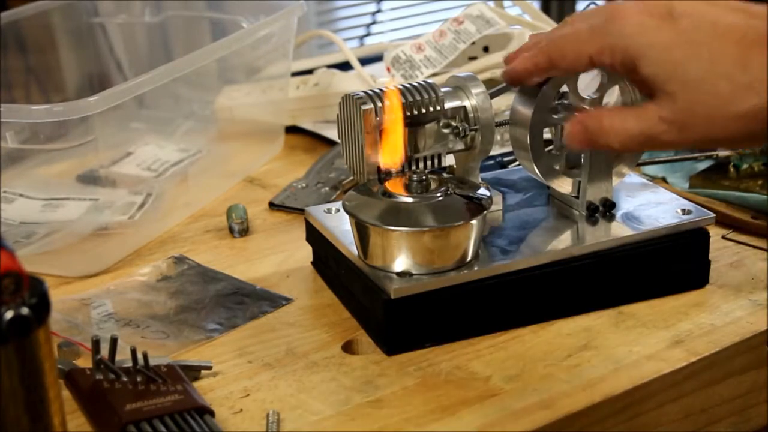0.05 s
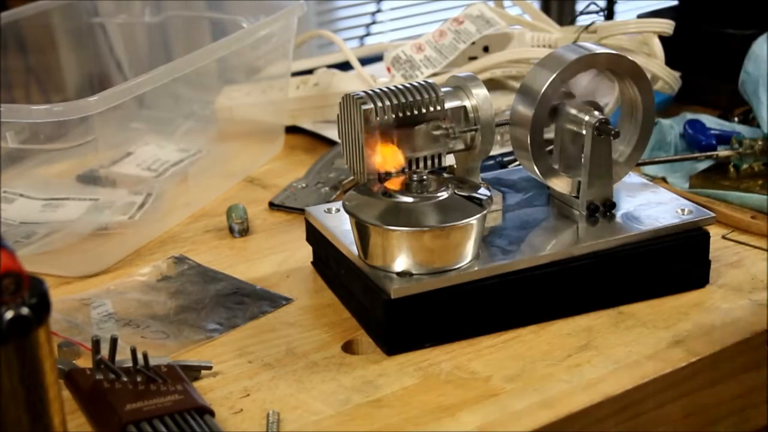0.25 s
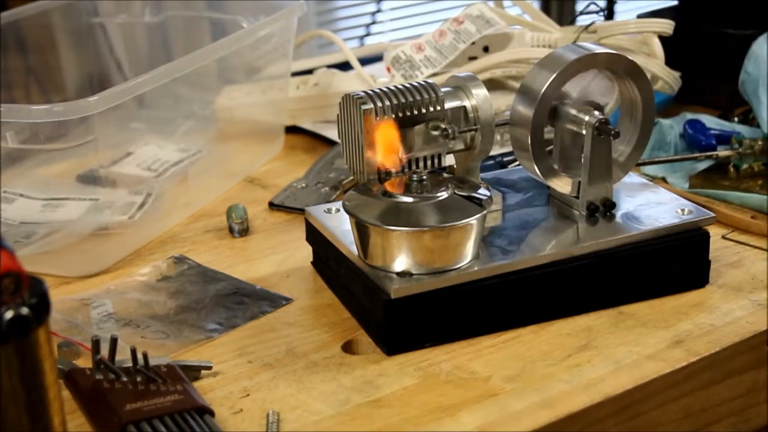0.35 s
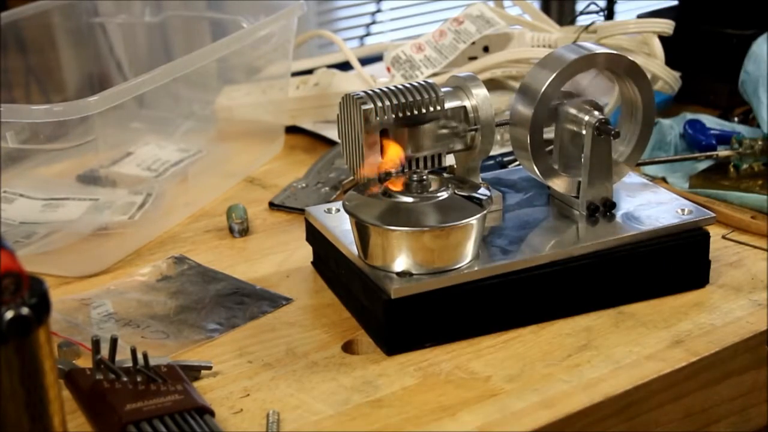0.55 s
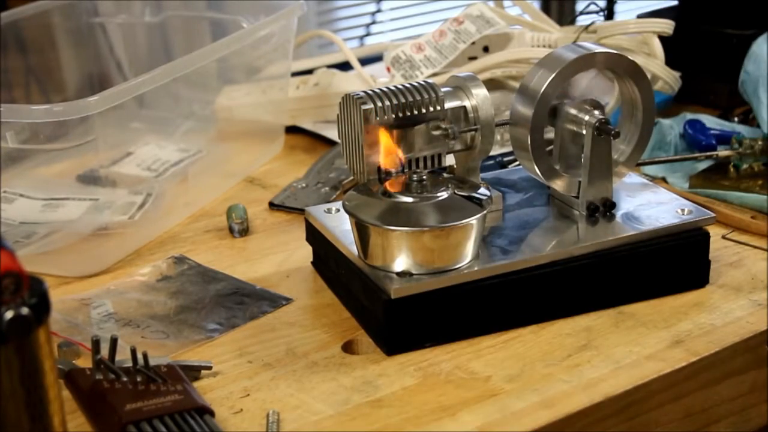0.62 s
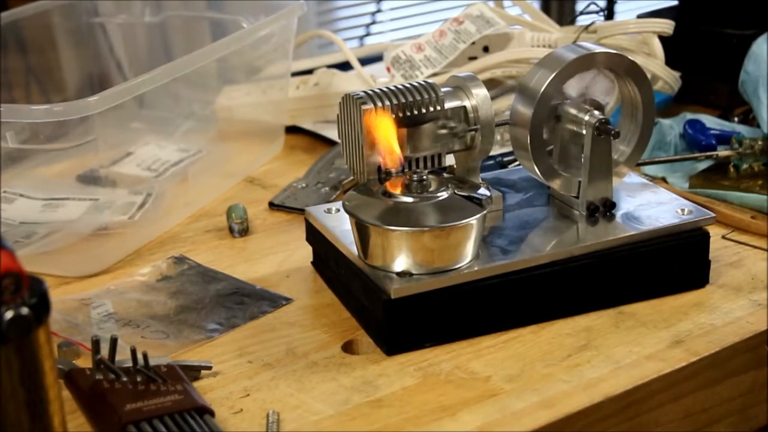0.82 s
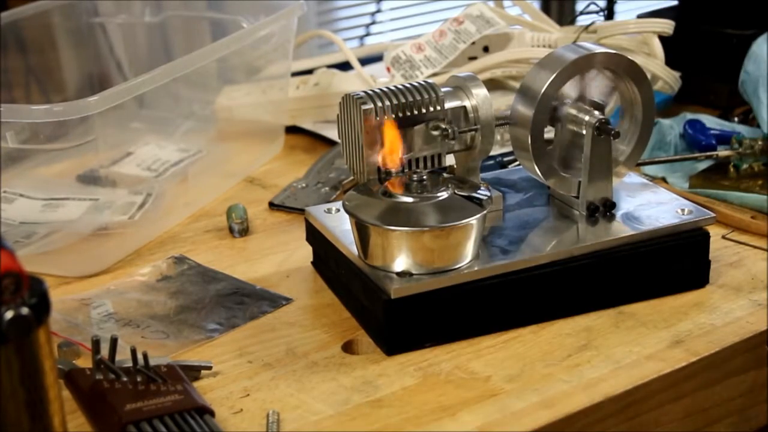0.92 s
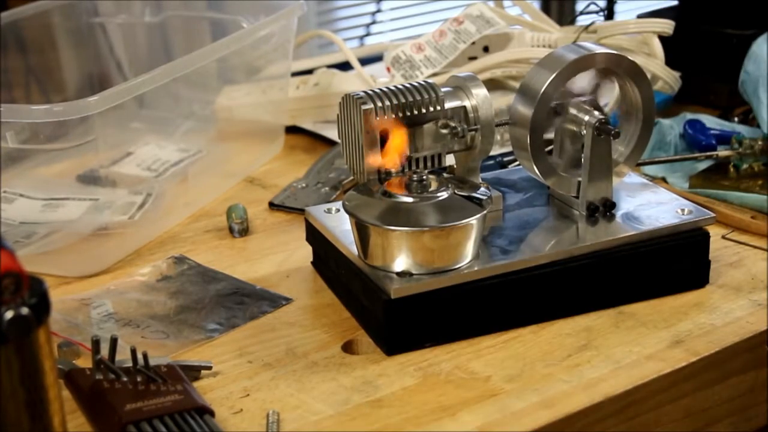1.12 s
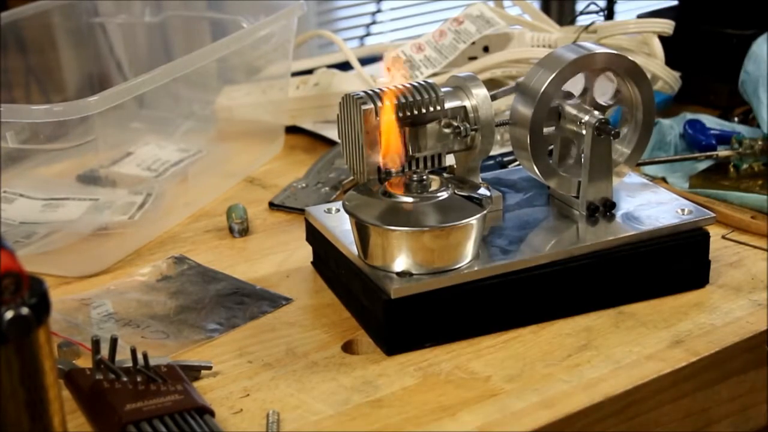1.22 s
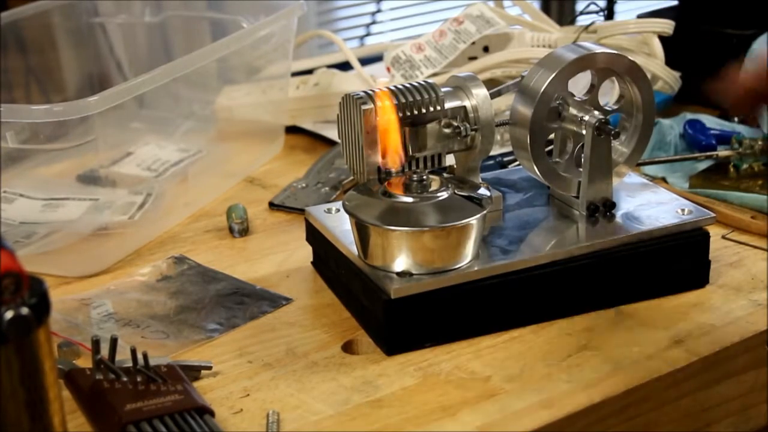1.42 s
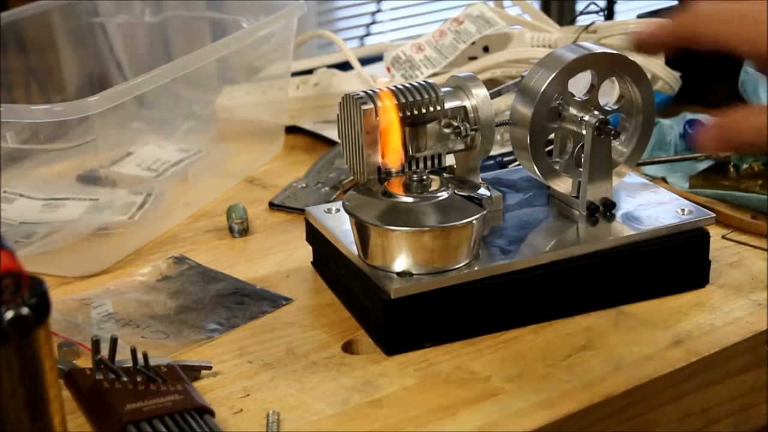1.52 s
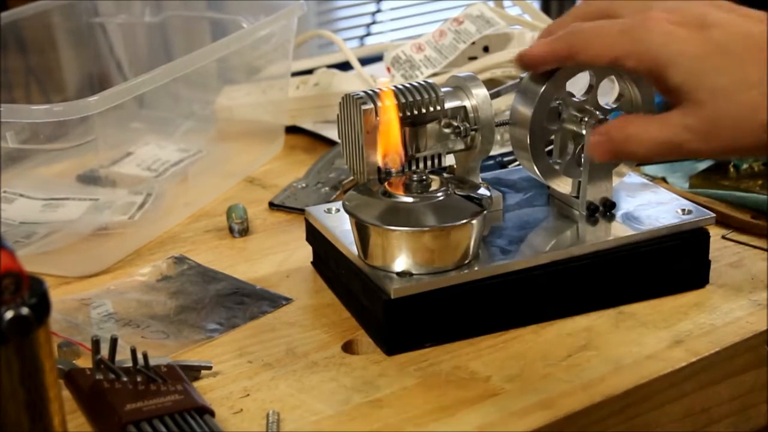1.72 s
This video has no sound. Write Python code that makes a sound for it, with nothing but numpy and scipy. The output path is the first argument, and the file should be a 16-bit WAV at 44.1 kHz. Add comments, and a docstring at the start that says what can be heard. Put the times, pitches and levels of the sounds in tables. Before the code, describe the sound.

A small metal model engine, flicked by its flywheel, rattles and clacks through a few turns with thin, high squeaks. Its base knocks on a wooden workbench, and it stalls in a softly humming workshop with a short echo.

```python
"""First comes the steady hum of a small workshop. Then a small metal model engine, flicked by its
flywheel, rattles through a few turns and stalls. Its loose linkage clacks and rings the frame. Its dry
piston squeals on every stroke, the pitch rising and falling with the sliding speed; it also scrapes and
groans under load and judders as it breaks loose. The base knocks on the wooden workbench, and the room
adds a short echo."""
import sys
import numpy as np
from scipy import signal
from scipy.fft import rfft, irfft
from scipy.io import wavfile

SR = 44100
rng = np.random.default_rng(int(sys.argv[2]) if len(sys.argv) > 2 else 0)


def wrap_up_sound(samples):
    """Save the sound to the file named by the first command line argument, as 16-bit audio."""
    columns = np.atleast_2d(samples).T
    # keep every value between -1 and 1, then stretch to whole-number steps
    tamed = np.clip(columns, -1, 1)
    steps = np.round(tamed * 32767).astype(np.int16)
    wavfile.write(sys.argv[1], SR, steps)


N = 77175
TIME = np.arange(N) / SR


def from_db(db):
    """Turn decibels into a number to multiply by."""
    return 10 ** (np.asarray(db) / 20)


def unit_power(x):
    """Scale a signal so that its average power is 1."""
    return x / np.sqrt(np.mean(x ** 2) + 1e-20)


def at_each_hz(table):
    """Fill in a table's value at every frequency."""
    hz, value = np.transpose(table)
    return np.interp(np.log(np.fft.rfftfreq(N, 1 / SR) + 1e-9), np.log(hz), value)


def colour(x, spectrum):
    """Turn each frequency up or down by a table's decibels."""
    return irfft(rfft(x) * from_db(at_each_hz(spectrum)), N)


def noise(spectrum):
    """Noise of power 1, coloured by a table."""
    return unit_power(colour(rng.standard_normal(N), spectrum))


def drift(hz):
    """A smooth random wobble of about 1 either way; more hz makes it faster."""
    r = np.exp(-2 * np.pi * hz / SR)
    white = rng.standard_normal(N + SR // 2)
    return unit_power(signal.lfilter([1], [1, -2 * r, r * r], white)[-N:])


def dying(start, fade_s):
    """Jump to 1, then die away. A fade time is how long a sound takes to drop 60 dB."""
    age = TIME - start
    return (age >= 0) * from_db(-60 * np.clip(age / fade_s, 0, 3))


def held(start, length, attack_s=.002, release_s=.002):
    """Rise, hold and let go: the loudness of one slide."""
    age = TIME - start
    return np.clip(age / attack_s, 0, 1) * np.exp(-np.maximum(age - length, 0) / release_s)


def pair(mid, side, likeness):
    """Mix two signals into left and right: likeness 0 is unrelated, 1 is the same."""
    return np.sqrt((1 + likeness) / 2) * mid + np.sqrt((1 - likeness) / 2) * side * np.array([[1], [-1]])


def stereo(mid, side, likeness):
    """Left and right, with a likeness that depends on frequency."""
    return irfft(pair(rfft(mid), rfft(side), at_each_hz(likeness)), N)


def strike(times, db, tones, scatter_db):
    """Each blow rings an object's own tones, in a slightly different mix."""
    out = np.zeros(N)
    for hz, tone_db, fade_s in tones:
        clicks = np.zeros(N)
        scatter = scatter_db * rng.standard_normal(len(times))
        clicks[(times * SR).astype(int)] = from_db(db + tone_db + scatter)
        decay, step = from_db(-60 / (fade_s * SR)), 2 * np.pi * hz / SR
        ring = signal.lfilter([0, np.sin(step)], [1, -2 * decay * np.cos(step), decay ** 2], clicks)
        out += ring * rng.choice([-1, 1])
    return out


# The room's background noise. Each row: frequency in Hz, relative level in dB.
AIR_SPECTRUM = [(15, -37), (25, -10.5), (92, -4), (256, -4), (363, -4), (818, -8.5), (1290, -13.5),
                (1480, -10), (1610, -10.5), (1740, -12), (3430, -21.5), (14400, -31.5), (16000, -45)]
# How alike that noise is left and right. Each row: frequency in Hz, likeness from 0 to 1.
AIR_LIKENESS = [(60, 1), (300, 0.81), (600, 0.58), (1300, 0.045), (10000, .03)]
# The tones of the hum. Each row: pitch in Hz, level in dB.
HUM_TONES = [(120, -57), (182, -56), (236, -60.5)]
def workshop_hum():
    """Low, slightly wavering tones over a soft, steady rush."""
    air = stereo(noise(AIR_SPECTRUM), noise(AIR_SPECTRUM), AIR_LIKENESS)
    out = from_db(-45.27) * air
    for hz, db in HUM_TONES:
        phase = 2 * np.pi * hz * np.cumsum(1 + .017 * drift(hz=23)) / SR
        out += from_db(db) * unit_power(np.sin(phase))
    return out


# The rattle swells, then fades as the engine stalls. Each row: time in seconds, level in dB.
RATTLE_LEVELS = [(.05, -84), (.18, -62.5), (.22, -43), (.26, -38), (.29, -36), (.35, -33), (.42, -35),
                 (.50, -39.5), (.55, -34.5), (.66, -39.5), (.74, -38), (.88, -45.5), (1.0, -52.5),
                 (1.07, -53.5), (1.10, -53), (1.2, -56), (1.3, -63)]
# The rattle's tone colour. Each row: frequency in Hz, relative level in dB.
RATTLE_SPECTRUM = [(60, -25), (170, 5), (400, 4), (800, -1), (1600, 3.5), (2500, 0.5), (4800, 0.5),
                   (6500, -2.5), (9000, -4), (12000, -8.5), (16000, -39)]
def bearing_rattle(taps_per_s=890, spread_db=.5, fade_s=.0088):
    """The bearing makes many tiny taps while the wheel turns."""
    taps = rng.random(N) < taps_per_s / SR
    strength = from_db(spread_db * np.minimum(rng.exponential(1, N), 4))
    power = signal.fftconvolve((taps * strength) ** 2, dying(0, fade_s / 2))[:N]
    rattle = unit_power(noise(RATTLE_SPECTRUM) * np.sqrt(np.abs(power)))
    level_db = np.interp(TIME, *np.transpose(RATTLE_LEVELS), left=-90, right=-90)
    return rattle * from_db(level_db)


# Loose parts hit each other. Each row: start in seconds, level in dB,
# added brightness in dB per octave, left-right likeness from 0 to 1.
LINKAGE_HITS = [(0.099, -46.5, 0.5, 0.74), (.160, -34, -9.5, .8), (0.238, -41, 22, 0.5),
                (0.266, -27.5, 0.5, 0), (.299, -26.5, 1, 0.7), (0.3089, -16, 3.5, 0.23),
                (0.362, -23, 1, 0.4), (0.3836, -16.5, -0.5, 0.73), (0.3881, -16.5, -2.5, 0.98),
                (0.4027, -27.5, -1.5, .9), (0.4196, -19, 7, 1), (0.4224, -22, 3, 1), (.4462, -24, 10, .95),
                (0.5, -26.5, 2.5, 0.9), (0.529, -26.5, -1, 1), (.543, -30, 6, 1), (.623, -25.5, 6, .9),
                (0.7034, -18, -1, 0.46), (0.7073, -18, -0.5, 0.84), (0.72, -33, -3.5, 1),
                (.728, -23.5, 7, 0.4), (0.773, -34.5, -3, 0.6), (0.838, -28.5, 6, .9),
                (.975, -37.5, 0.5, 0.9)]
# A clack's tone colour. Each row: frequency in Hz, relative level in dB.
CLACK_SPECTRUM = [(60, -35), (150, -3), (400, -3.5), (800, -4.5), (1300, -3.5), (2200, -0.5), (3800, 2.5),
                  (6500, -3.5), (9500, -1), (15000, -13)]
# The metal frame's own tones. Each row: pitch in Hz, relative level in dB, fade time in seconds.
FRAME_TONES = [(1250, 3, .04), (1720, 5, .06), (2750, -2, .03), (3680, -1, 0.031), (4900, 3.5, .08),
               (5106, 0.5, .05), (8230, -8, .1)]
def linkage_clacks(frame_db=-15):
    """The linkage takes up its slack with a short burst of noise and a ring of the frame."""
    bursts = np.zeros((2, N))
    for start, db, brightness, likeness in LINKAGE_HITS:
        spectrum = [(hz, level + brightness * np.log2(hz)) for hz, level in CLACK_SPECTRUM]
        burst = pair(noise(spectrum), noise(spectrum), likeness)
        bursts += from_db(db) * burst * dying(start, fade_s=.034)
    times, db, *_ = np.transpose(LINKAGE_HITS)
    return bursts + strike(times, db + frame_db, FRAME_TONES, scatter_db=3.5)


def friction_tone(hz, roughness, phase_gap=0, flutter_db=4.5):
    """Surfaces stick and slip very fast, making a tone unsteady in pitch and strength."""
    wobbly_hz = hz * (1 + roughness * drift(hz=600))
    phase = 2 * np.pi * np.cumsum(wobbly_hz) / SR + phase_gap * np.array([[-.5], [.5]])
    flutter = from_db(flutter_db * np.tanh(drift(hz=130)))
    return unit_power(np.sin(phase) * flutter)


def rasp(x):
    """A very fast flicker in loudness makes a tone gritty."""
    return x * unit_power(1 + .31 * drift(hz=1400))


# The piston's dry slides. Each row: start and length in seconds, fastest point from 0 to 1,
# left-right phase gap in radians, pitch in Hz at the start, fastest point and end,
# level in dB at the start, middle and end.
PISTON_SLIDES = [ (0.236, 0.0083, 0.5, 2.1, 8430, 8950, 8200, -4, -29.5, -26),
                 (0.251, 0.018, 0.3, 2.1, 9600, 9900, 9500, -14.5, -31.5, -33),
                 (0.305, 0.026, .45, 2.2, 8700, 10540, 9300, -15.5, -24.5, -14.5),
                 (0.354, 0.032, 0.3, 1.6, 12100, 12200, 12000, -26, -29.5, -25.5),
                 (0.395, 0.0115, 0.3, .3, 10850, 10770, 10070, -28, -23.5, -20.5),
                 (0.439, .026, .33, .1, 8390, 11690, 8450, -14.5, -25.5, -12.5),
                 (.502, 0.027, 0.33, 0.22, 12140, 12530, 12100, -29, -29, -33),
                 (0.59, 0.038, .35, 0.76, 9500, 11060, 7970, -20, -23, -21.5),
                 (0.671, 0.02, 0.04, 1.7, 12400, 12500, 12200, -25, -25, -26.5),
                 (.789, .050, .3, 0.36, 9100, 12150, 7810, -19.5, -30.5, -22.5),
                 (0.898, 0.0058, 0.8, 0.27, 8530, 8770, 8420, -40, -27.5, -35),
                 (0.903, 0.044, 0.06, 0.082, 12250, 12300, 11860, -36, -35.5, -40),
                 (.960, 0.0058, 0.08, 0.18, 10400, 10260, 8900, -30, -28.5, -42),
                 (1.117, 0.0156, 0.82, 1.7, 8840, 9900, 9600, -26.5, -24, -28.5),
                 (1.132, 0.046, 0.4, 1.53, 10100, 11850, 10770, -34, -31.5, -32),
                 (1.246, 0.037, .1, 1.8, 11220, 11010, 10600, -55, -42, -47)]
def piston_squeals():
    """The dry piston squeals at a pitch that follows its sliding speed."""
    out = np.zeros((2, N))
    for start, length, fastest, phase_gap, start_hz, fast_hz, end_hz, *levels_db in PISTON_SLIDES:
        progress = (TIME - start) / length
        speed = np.sin(np.pi * np.interp(progress, [0, fastest, 1], [0, .5, 1]))
        slow_hz = np.where(progress < fastest, start_hz, end_hz)
        roughness = .017 + .0007 * max(np.mean(levels_db) + 28, 0)  # rougher when above -28 dB
        tone = friction_tone(slow_hz + (fast_hz - slow_hz) * speed, roughness, phase_gap)
        loudness = from_db(np.interp(progress, [0, .5, 1], levels_db))
        out += tone * held(start, length) * loudness
    return out


# Strokes under load. Each row: start and length in seconds, scrape level in dB,
# groan pitch in Hz, groan level in dB.
LOADED_STROKES = [(0.251, 0.014, -29.5, 1490, -60), (0.31, 0.0184, -25.5, 1527, -32),
                  (0.425, .034, -24.5, 1619, -31), (0.591, 0.0277, -28.5, 1588, -32),
                  (0.664, .008, -39, 1574, -39.5), (0.776, 0.0537, -31.5, 1603, -40),
                  (.894, 0.019, -41, 1606, -51), (1.116, 0.059, -44.5, 1547, -56)]
# The scrape's tone colour. Each row: frequency in Hz, relative level in dB.
SCRAPE_SPECTRUM = [(300, -15), (1200, -11), (2200, -3), (4800, 2), (6200, -1), (8400, 11.5), (11000, 4.5),
                   (13500, -11), (16000, 0)]
def piston_scrape(groan_rise=.12):
    """The loaded piston rubs grittily, with a groan that rises through the stroke."""
    out = np.zeros((2, N))
    grit = unit_power(noise(SCRAPE_SPECTRUM) * from_db(3 * drift(hz=300)))
    for start, length, scrape_db, groan_hz, groan_db in LOADED_STROKES:
        progress = np.clip((TIME - start) / length, 0, 1)
        groan = friction_tone(groan_hz * (1 + groan_rise * (progress - .5)), roughness=.0501)
        rubbing = from_db(scrape_db) * grit + from_db(groan_db) * groan
        out += rubbing * held(start, length, attack_s=.004)
    return out


# The base hits the bench. Each row: start in seconds, level in dB.
BASE_HITS = [(.255, -32.5), (0.276, -29), (0.287, -42), (0.3999, -25), (0.4106, -17.5), (.419, -25),
             (0.422, -29), (0.544, -34), (.561, -33), (0.572, -32.5), (0.582, -39)]
# The wooden top's own tones. Each row: pitch in Hz, relative level in dB, fade time in seconds.
BENCH_TONES = [(176, -4, 0.1), (230, -21, .04), (291, -4, .06), (358, -2, 0.038), (444, -3.5, 0.023),
               (800, -10, 0.026)]
# The wood's dull thud. Each row: frequency in Hz, relative level in dB.
THUD_SPECTRUM = [(40, -45), (110, -42), (170, -2), (380, -8), (600, -16), (1200, -20), (4000, -50)]
def bench_knocks(thud_db=-2.5, lowest_hz=145):
    """The rocking base knocks low tones and a thud out of the bench, which gives off no deep bass."""
    times, db = np.transpose(BASE_HITS)
    ringing = strike(times, db, BENCH_TONES, scatter_db=.5)
    push = TIME * dying(0, fade_s=.0022)  # a soft blow is spread out in time
    softened = signal.fftconvolve(ringing, push / push.sum())[:N]
    pulses = sum(from_db(level + thud_db) * dying(start, fade_s=.026) for start, level in BASE_HITS)
    thud = noise(THUD_SPECTRUM) * pulses
    bass_cut = signal.butter(4, lowest_hz, "high", fs=SR, output="sos")
    return signal.sosfilt(bass_cut, softened + thud)


# The piston comes unstuck. Each row: start and length in seconds, pitch in Hz, level in dB.
PISTON_BREAKAWAYS = [(.666, .007, 5000, -35), (.782, .008, 4400, -31), (.895, .008, 4800, -38),
                     (1.1160, .008, 4500, -34)]
def piston_judders():
    """Breaking loose, the piston gives a short tone, lower and rougher than its squeal."""
    out = np.zeros((2, N))
    for start, length, hz, db in PISTON_BREAKAWAYS:
        out += friction_tone(hz, roughness=.09) * held(start, length) * from_db(db)
    return out


# Quick echoes off the clutter on the bench. Each row: frequency in Hz, relative level in dB.
CLUTTER_SPECTRUM = [(150, -13), (450, -1), (900, -2.5), (12000, -2)]
# The room's longer echo. Each row: frequency in Hz, relative level in dB.
ROOM_SPECTRUM = [(100, -22), (400, -6), (1500, -12.5), (5000, -6), (10000, -8.5), (12000, -5), (15000, -15)]
# How alike the echoes are left and right. Each row: frequency in Hz, likeness from 0 to 1.
ECHO_LIKENESS = [(200, 0.94), (450, 0.96), (800, 0.18), (3000, .05), (6000, 0.34), (12000, 0.74)]
def workshop_echo(x):
    """Sound arrives directly, then bounces off nearby clutter, then around the room."""
    white = rng.standard_normal((2, 2, N))
    early = colour(unit_power(white[0] * dying(.0008, fade_s=.095)), CLUTTER_SPECTRUM) * from_db(-1)
    tail = colour(unit_power(white[1] * dying(.0071, fade_s=.43)), ROOM_SPECTRUM)
    echoes = stereo(*(early + tail), ECHO_LIKENESS) / np.sqrt(N)
    direct = x * from_db([[-.2], [.2]])  # a touch to the right
    return direct + signal.fftconvolve(x, echoes, axes=1)[:, :N]


def scene():
    """The engine turns and stalls in the humming room."""
    piston = rasp(piston_squeals() + piston_judders()) + piston_scrape()
    engine = piston + linkage_clacks() + bench_knocks() + bearing_rattle()
    return workshop_echo(engine) + workshop_hum()


def record(dry, cutoff_hz=15400):
    """Cut away the very highest treble."""
    treble_cut = signal.ellip(10, .1, 80, cutoff_hz, fs=SR, output="sos")
    return signal.sosfilt(treble_cut, dry)


dry = scene()
out = record(dry)
wrap_up_sound(out)
```